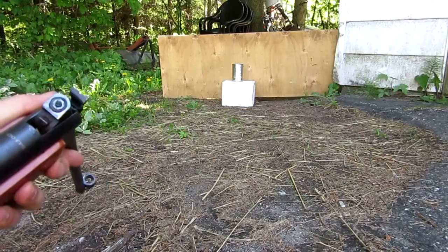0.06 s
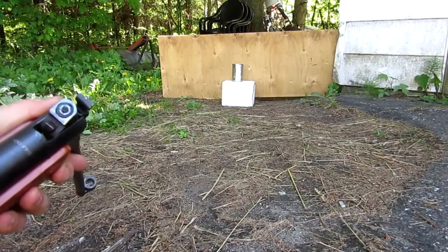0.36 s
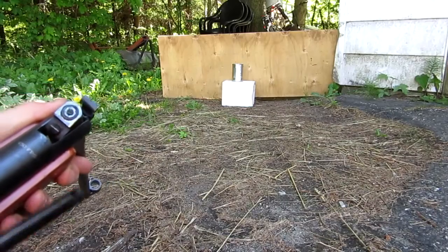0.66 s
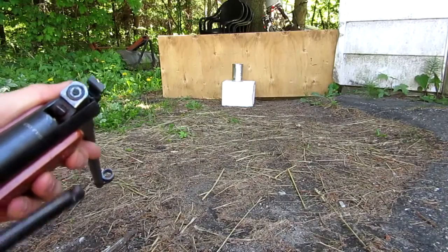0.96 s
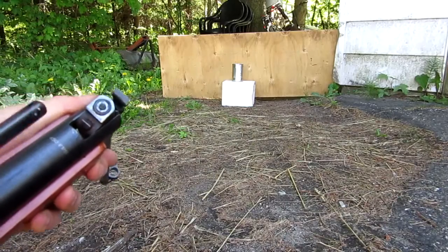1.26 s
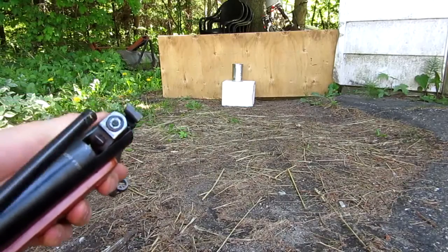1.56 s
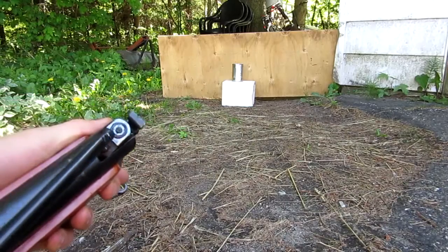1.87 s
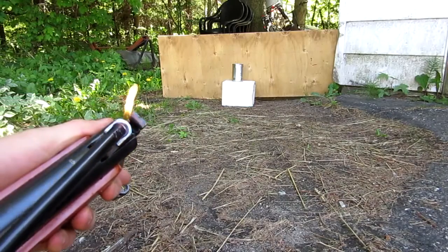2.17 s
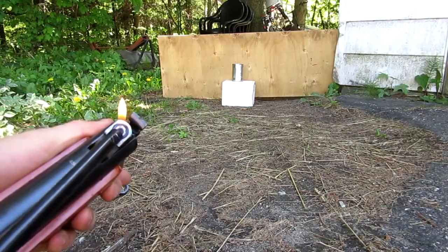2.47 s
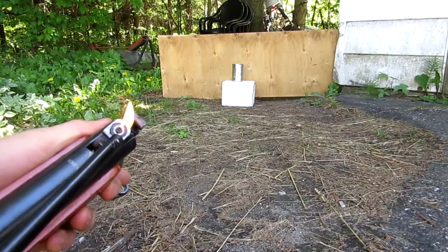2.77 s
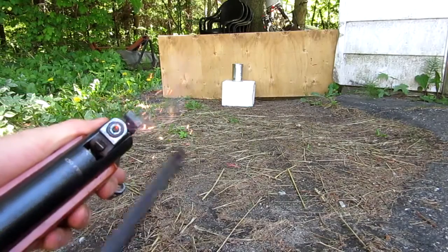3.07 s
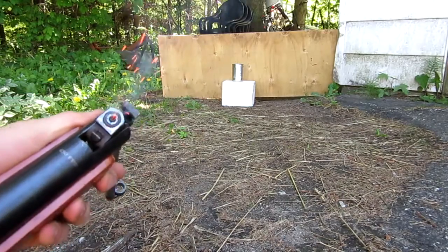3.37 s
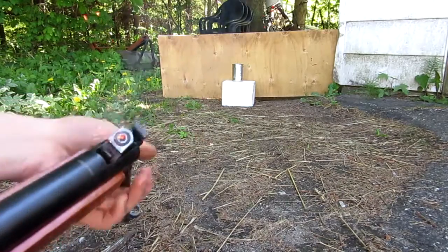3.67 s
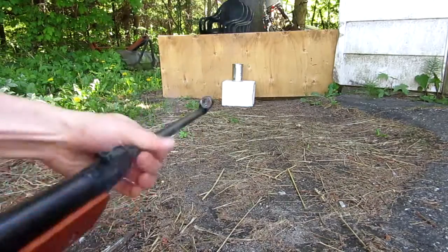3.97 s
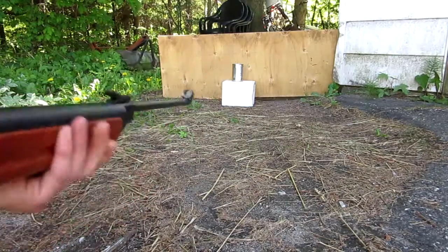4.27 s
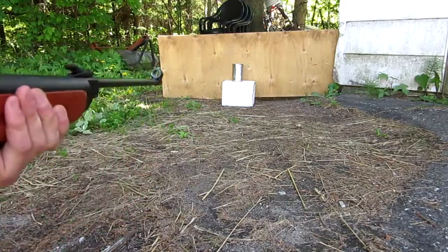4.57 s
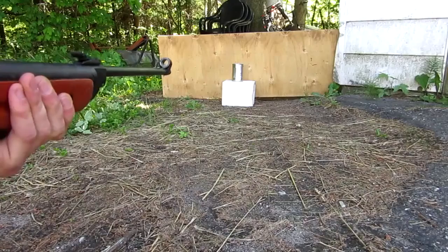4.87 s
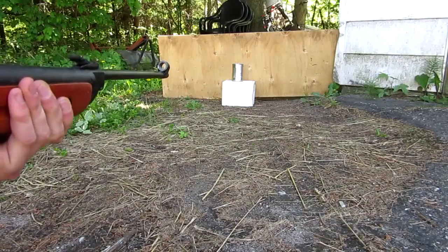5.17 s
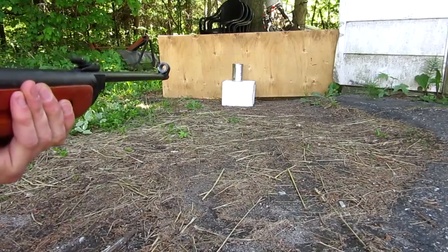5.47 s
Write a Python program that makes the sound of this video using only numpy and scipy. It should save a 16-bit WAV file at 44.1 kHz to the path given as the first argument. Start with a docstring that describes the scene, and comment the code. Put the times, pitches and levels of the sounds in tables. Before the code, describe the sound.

Close to the microphone in a quiet yard, an air gun gives a short knock and fingers rub softly over it. A lighter creaks faintly, then fires with one sharp click. A fuse catches and fizzes and spits for about a second while the gun is regripped with sharp wood and steel knocks. The barrel scrapes over its latch and shuts with a loud clunk. Distant traffic hums and birds call faintly.

```python
'''In a yard, an air gun is handled close to the camera. A lighter creaks, clicks and lights a fuse in the
breech, which fizzes and spits. The gun knocks as it is regripped, each impact exciting damped modes of
wood, steel and the camera's housing, and the barrel scrapes over its latch and snaps shut. Distant
traffic hums, birds call faintly, and the camera's gain control ducks everything after each loud blow.'''
import sys
import numpy as np
from scipy import signal
from scipy.fft import rfft, irfft
from scipy.io import wavfile

SR = 44100
rng = np.random.default_rng(int(sys.argv[2]) if len(sys.argv) > 2 else 0)


def transcribe(signal):
    """Save signal, clipped to [-1, 1], as a 16-bit WAV file at the path in sys.argv[1]."""
    frames = np.atleast_2d(signal).T
    limited = np.clip(frames, -1, 1)
    pcm = np.round(limited * 32767).astype(np.int16)
    wavfile.write(sys.argv[1], SR, pcm)


N = 243828
TIME = np.arange(N) / SR
RING_TIME = np.arange(4096) / SR
CATCH_S, SHUT_S = 3.114, 3.98  # the fuse burns from catching until the barrel shuts it in

# spectrum of hard contact, as of steel on steel: frequency_hz, level_db
CONTACT_SPECTRUM = [(1500, -10.5), (3300, -8), (4100, -5), (5000, -1.5), (6300, -2), (8200, -1),
                    (9700, -7.5), (11500, -9), (13500, -11.5), (15000, -16), (16000, -23)]


def amp(db):
    """Amplitude ratio of a level in decibels."""
    return 10 ** (np.asarray(db) / 20)


def unit_rms(x):
    """Power normalisation to rms 1."""
    return x / np.sqrt(np.mean(x ** 2) + 1e-20)


def burst(x):
    """Energy normalisation of a transient to that of 5 ms at rms 1."""
    return x * np.sqrt(.005 * SR / (np.sum(x ** 2) + 1e-20))


def value_at(points, hz):
    """Interpolation of a table along a logarithmic frequency axis."""
    f, value = np.transpose(points)
    return np.interp(np.log(hz + 1), np.log(f + 1), value)


def add(mix, start_s, sound):
    """Superposition of a sound on the mix."""
    part = mix[max(round(start_s * SR), 0):][:len(sound)]
    part += sound[:len(part)]


def colour(x, spectrum):
    """Minimum-phase filtering: a causal response with the given spectrum."""
    log_gain = np.log(amp(value_at(spectrum, abs(np.fft.fftfreq(4096, 1 / SR)))))
    taps = np.fft.ifft(np.exp(np.conj(signal.hilbert(log_gain)))).real
    return signal.oaconvolve(x, taps)[:len(x)]


def narrowband(hz, half_width_hz):
    """A resonance driven by noise gives a wavering tone."""
    f = np.fft.rfftfreq(N, 1 / SR)
    return unit_rms(irfft(rfft(rng.standard_normal(N)) / (1 + ((f - hz) / half_width_hz) ** 2), N))


def waver(per_s, depth_db):
    """Random modulation: a factor that wanders about 1."""
    return amp(depth_db * np.interp(TIME * per_s, np.arange(4096), rng.standard_normal(4096)))


def grains(spread_db):
    """Granular noise: dense tiny impacts of uneven size."""
    size_db = spread_db * np.minimum(rng.exponential(1, N // 16 + 1), 5)
    return rng.standard_normal(N) * amp(np.repeat(size_db, 16)[:N])


def ring(modes, detune, rise_s):
    """Free vibration in damped modes; each blow lands elsewhere and weights them differently."""
    hz, db, t60 = np.transpose(modes)[:, :, None]
    weight_db, shift, phase = rng.standard_normal((3, len(modes), 1))
    decay = amp(db + weight_db - 60 * RING_TIME / t60)
    waves = decay * np.sin(2 * np.pi * (hz * (1 + detune * shift) * RING_TIME + phase))
    # little is radiated below the lowest mode
    skirt = signal.butter(2, .75 * hz.min(), "highpass", fs=SR, output="sos")
    return burst(signal.sosfilt(skirt, waves.sum(0) * (1 - np.exp(-RING_TIME / rise_s))))


def crack(spectrum, t60_s, spike_s=.0006):
    """An impulse is broadband: a sharp spike of noise, then a short rattle."""
    decay = amp(-60 * RING_TIME / t60_s) + 1.2 * np.exp(-RING_TIME / spike_s)
    return burst(colour(rng.standard_normal(len(RING_TIME)) * decay, spectrum))


def traffic(level_db=-50.5, pass_s=1.43, pass_width_s=.21, pass_db=5):
    """Distant vehicles sum incoherently to a low roar, which swells as one passes."""
    # spectrum of the roar: frequency_hz, level_db
    spectrum = [(20, 2.5), (45, -1), (70, 10), (120, -1), (220, -0.5), (450, -2), (750, -6), (900, -6),
                (1080, -8), (1400, -8.5), (1800, -45.5), (3000, -39), (8000, -44.5)]
    level = amp(level_db + pass_db * np.exp(-((TIME - pass_s) / pass_width_s) ** 2))
    roar = unit_rms(colour(rng.standard_normal(N), spectrum))
    return roar * level * waver(per_s=6.3, depth_db=-1.9)


def engine(pitch_hz=78, overtone_db=-9):
    """Nearly periodic motion in a distant engine gives a fundamental and its second harmonic."""
    # course of the hum: time_s, level_db
    levels = [(0, -72), (.17, -55.5), (.9, -51), (2.0, -49.5), (3.1, -49.5), (3.65, -57), (5.1, -50.5),
              (5.53, -52.5)]
    wavering_hz = pitch_hz * waver(per_s=6.2, depth_db=.33)
    tone = np.sin(2 * np.pi * np.cumsum(wavering_hz) / SR)
    fundamental = .83 * tone + .77 * narrowband(pitch_hz, half_width_hz=22)
    overtone = amp(overtone_db) * narrowband(2 * pitch_hz, half_width_hz=27)
    return (fundamental + overtone) * amp(np.interp(TIME, *np.transpose(levels)))


def camera_noise(hiss_db=-58):
    """Self-noise of the camera: a narrowband whirr over broadband hiss."""
    # bands of the whirr: pitch_hz, width_hz, level_db
    bands = [(885, 55, -64), (1269, 87, -58), (1503.5, 28, -60)]
    # spectrum of the hiss: frequency_hz, level_db
    hiss_spectrum = [(100, -7.5), (1500, 13.5), (2500, 3), (4000, 1), (7500, 0), (10500, -4.5),
                     (12000, -7.5), (15000, -9.5), (16000, -28.5)]
    whirr = sum(amp(db) * narrowband(hz, width / 2) for hz, width, db in bands)
    return whirr + amp(hiss_db) * unit_rms(colour(rng.standard_normal(N), hiss_spectrum))


def blow(strength_db, thud_db, clank_db, tick_db, stock_below_hz=1000, steel_from_hz=1450):
    """Impact excitation: the stock thuds, middle modes and steel ring, and the contact ticks."""
    # modes heard on each blow, including a 1.2 kHz ring of the camera's housing:
    # pitch_hz, level_db, t60_s
    modes = [(705, -3, 0.021), (809.3, 3, 0.014), (928.5, -3.5, 0.02), (1058, -8.5, 0.029), (1203, 1, .023),
             (1413, -7, .014), (1630, 4, .018), (1830, -0.5, 0.012), (2230, -2, 0.018), (2670, 0.5, .018),
             (3030, -7, .018), (3450, -2.5, 0.008)]
    # heavy blows stay in contact longer and thud lower: strength_db, pitch_hz
    thud_pitches = [(-15, 350), (-4.5, 200)]
    stock_modes = [m for m in modes if m[0] < stock_below_hz]
    middle_modes = [m for m in modes if stock_below_hz <= m[0] < steel_from_hz]
    steel_modes = [m for m in modes if m[0] >= steel_from_hz]
    thud_hz = np.interp(strength_db, *np.transpose(thud_pitches))
    cycles = thud_hz * RING_TIME
    thud = burst(np.sin(2 * np.pi * cycles) * cycles * np.exp(-cycles / .43))
    # a deeper blow drives the low modes of the wood harder
    wood = (300 / thud_hz) ** 1.5 * ring(stock_modes, detune=.02, rise_s=.0005)
    middle = ring(middle_modes, detune=.01, rise_s=.00073)
    clank = amp(clank_db) * ring(steel_modes, detune=.044, rise_s=.00011)
    tick = amp(tick_db) * crack(CONTACT_SPECTRUM, t60_s=.012)
    return amp(strength_db) * (middle + amp(thud_db) * (thud + wood) + clank + tick)


def gun_knocks(rebound_db=-9, dull_db=-3.5, lowest_hz=62):
    """Inelastic collision: after each blow the loose parts rebound, softer and duller."""
    # blows on the gun, with thud, clank and tick relative to the strength:
    # start_s, strength_db, thud_db, clank_db, tick_db, rebound_delay_s
    knocks = [(0.0553, -39.5, -25, 10.5, 5, .0025), (0.061, -32, -17, -1, -4.5, .002),
              (0.1016, -14.5, -34.5, -11.5, -9.5, 0.003615), (3.3498, -14.5, 0, 11, 0.5, .0028),
              (3.3573, -20.5, -11, -3, -1, 0.0042), (3.3737, -13.5, 0, 4.5, 13, 0.0012),
              (3.418, -28, -6, 5, -3.5, 0.004), (3.541, -28, -8.5, -4.5, -15, .004),
              (3.5816, -24, -11.5, 4, 6, .0085), (3.6769, -25.5, -7, 3, -7, .0035),
              (3.7055, -40.5, 9.5, 11, 10.5, 0.0018), (3.7522, -45, 5, 5, -4, 0.0022),
              (3.9078, -42.5, -2, 10, 3, .003), (3.9615, -18.5, -8, 1, -3, .0125),
              (3.9832, 2, -8.5, -7.5, -13.5, 0.0078), (4.004, -35.5, -2.5, 7.5, 14, .002),
              (4.0124, -3.5, -13, -11, -19, 0.0065)]
    out = np.zeros(N)
    for start_s, strength_db, thud_db, clank_db, tick_db, delay_s in knocks:
        add(out, start_s, blow(strength_db, thud_db, clank_db, tick_db))
        rebound = blow(strength_db + rebound_db, thud_db, clank_db + dull_db, tick_db + dull_db)
        add(out, start_s + delay_s, rebound)
    # the knocks carry no deep bass
    return signal.sosfilt(signal.butter(2, lowest_hz, "highpass", fs=SR, output="sos"), out)


def steel_scrapes(steel_db=-5, attack_s=.001, release_s=.0051):
    """Friction: steel parts rattle briefly after knocks, and the latch grinds as the barrel shuts."""
    # steel slides and rattles on steel: start_s, length_s, final_level_db, swell_db
    scrapes = [(0.061, 0.017, -43.5, 0), (3.35, 0.021, -32.5, -10), (3.573, 0.0064, -16.5, 16),
               (3.911, 0.043, -29, 17.5), (3.959, 0.007, -12.5, -3.5), (3.972, 0.014, -9, 1.5),
               (4.01, .013, -23, -1)]
    # spectrum of the scraping: frequency_hz, level_db
    grit_spectrum = [(30, -36.5), (130, -16), (500, -22.5), (750, -2), (1300, 3.5), (2300, -6), (3400, -4),
                     (4500, -15), (8000, -12.5), (10500, -9.5), (11800, -33), (15000, -29), (16000, -41.5)]
    pressure = np.zeros(N)
    for start_s, length_s, db, swell_db in scrapes:
        attack = np.minimum(RING_TIME / attack_s, 1)
        swell = amp(db - swell_db * np.maximum(1 - RING_TIME / length_s, 0))
        release = np.exp(-np.maximum(RING_TIME - length_s, 0) / release_s)
        add(pressure, start_s, attack * swell * release)
    grit = unit_rms(colour(grains(spread_db=1.8), grit_spectrum))
    slips = unit_rms(colour(grains(spread_db=3.5), CONTACT_SPECTRUM))
    return pressure * (grit + amp(steel_db) * slips)


def fingers():
    """Stick-slip friction: skin catches and slides on wood and steel."""
    # strokes along the gun: start_s, length_s, level_db
    rubs = [(0.124, 0.21, -58.5), (0.221, 0.047, -51.5), (0.302, 0.031, -51), (0.337, 0.018, -55),
            (0.68, 0.058, -56.5), (1.058, 0.11, -63), (4.238, 0.23, -57.5)]
    # spectrum of rubbing skin: frequency_hz, level_db
    spectrum = [(200, -17), (1500, 1), (2500, 7), (3700, -2), (5300, 3.5), (8000, -1.5), (11500, -7),
                (14000, -13), (16000, -30)]
    catching = waver(per_s=150, depth_db=2.5)
    friction = unit_rms(colour(grains(spread_db=4), spectrum) * catching)
    pressure = np.zeros(N)
    for start_s, length_s, db in rubs:
        add(pressure, start_s, amp(db) * signal.windows.tukey(int(length_s * SR) + 2, .8))
    return pressure * friction


def click(clack_db, snap_db, ring_db=-3, spring_from_hz=4000):
    """Heavy damping makes a dry click: the lighter's plastic case clacks and its spring snaps."""
    # modes heard on each click, including a 1.2 kHz ring of the camera's housing:
    # pitch_hz, level_db, t60_s
    modes = [(1200, 3.5, 0.024), (1770, -1.5, 0.015), (2930, -9.5, 0.031), (4700, -1, 0.024),
             (6030, 5.5, .009), (6500, -7.5, 0.022), (7750, -3, 0.014), (7350, -5.5, 0.007),
             (8764, -7.5, 0.011), (10270, -7, .009), (13200, -5, .006)]
    # spectrum of the case: frequency_hz, level_db
    case_spectrum = [(200, -22), (700, -6), (1200, -0.5), (1900, -5), (2800, -0.5), (3700, -12),
                     (6000, -15), (15000, -33)]
    low_modes = [m for m in modes if m[0] < spring_from_hz]
    spring_modes = [m for m in modes if m[0] >= spring_from_hz]
    clack = crack(case_spectrum, t60_s=.012)
    clack += amp(ring_db) * ring(low_modes, detune=.015, rise_s=.0001)
    snap = crack(CONTACT_SPECTRUM, t60_s=.018)
    snap += amp(ring_db) * ring(spring_modes, detune=.036, rise_s=.0001)
    return amp(clack_db) * burst(clack) + amp(snap_db) * burst(snap)


def lighter(fire_s=2.2103, push_db=-5, push_s=.00059, zing_db=-39, zing_t60_s=.25):
    """The trigger creaks; the spring frees its elastic energy in a snap, a push of air and a zing."""
    # the trigger is squeezed and let go: start_s, level_db
    creaks = [(0.7581, -50), (0.7885, -45), (0.941, -73), (1.6, -52.5), (1.7713, -49.5), (1.8332, -41),
              (1.8955, -52.5), (1.9331, -47.5), (1.9717, -32), (2.8746, -58), (2.9645, -42.5),
              (2.999, -43.5)]
    # the clack follows a creak's level only in part, so louder creaks are brighter
    even_db, follow = -46, .27
    out = np.zeros(N)
    for start_s, db in creaks:
        add(out, start_s, click(clack_db=even_db + follow * (db - even_db), snap_db=db))
    add(out, fire_s, click(clack_db=-12.5, snap_db=-1.5))
    push = -amp(push_db) * np.sin(np.pi * np.minimum(RING_TIME / push_s, 1))
    add(out, fire_s - push_s, push)
    zing = amp(zing_db - 60 * TIME / zing_t60_s) * narrowband(hz=8000, half_width_hz=600)
    add(out, fire_s, zing)
    return out


def birds():
    """Scattering by the trees blurs far calls into gliding bands of noise."""
    # calls: start_s, length_s, start_hz, end_hz, blur_width_hz, level_db
    calls = [(2.7, 0.64, 3790, 4020, 219, -69), (4.096, 0.47, 4000, 3980, 240, -68),
             (4.43, 0.25, 3716, 3490, 399, -68), (5.11, 0.079, 2187, 2177, 24.7, -56),
             (5.161, 0.2, 2185, 2210, 70, -66.5), (5.38, .06, 2020, 1980, 39.8, -66)]
    out = np.zeros(N)
    for start_s, length_s, start_hz, end_hz, width_hz, db in calls:
        size = int(length_s * SR) + 2
        phase = 2 * np.pi * np.cumsum(np.linspace(start_hz, end_hz, size)) / SR
        lowpass = signal.butter(2, width_hz / 2, fs=SR, output="sos")
        blur = signal.sosfilt(lowpass, rng.standard_normal((2, size)))
        call = blur[0] * np.cos(phase) + blur[1] * np.sin(phase)
        add(out, start_s, amp(db) * unit_rms(call * signal.windows.tukey(size, .6)))
    return out


def fuse(burn_db=-50.5, fizz_db=-53.5, rise_s=.018, fade_s=.057, smoulder_db=-9, growth_db_per_s=55.5):
    """Combustion noise: the fuse smoulders, flares as it catches, then fizzes and spits."""
    # spectrum of the flame: frequency_hz, level_db
    flare_spectrum = [(25, -35.5), (70, -23), (200, -4), (450, -1.5), (750, 0.5), (1200, -2), (2300, -10.5),
                      (3500, -13.5), (6000, -15.5), (15000, -29.5)]
    # spectrum of the fizz: frequency_hz, level_db
    fizz_spectrum = [(200, -33), (1000, -14), (3000, -4.5), (5000, 1.5), (8500, -2), (10800, 1.5),
                     (12000, -6), (14800, -6.5), (15600, -28)]
    # surges of the flame: start_s, level_db
    flare_ups = [(3.12, -38), (3.68, -42.5)]
    # spits of the fuse: start_s, pop_db, crack_db
    spits = [(3.1945, -38.5, -43), (3.2132, -29, -26.5), (3.2355, -38, -64)]
    lit = np.clip((TIME - CATCH_S) / rise_s, 0, 1)
    smoulder = amp(smoulder_db + growth_db_per_s * np.minimum(TIME - CATCH_S, 0))
    burn = np.maximum(lit, smoulder) * (TIME < SHUT_S)
    flame = amp(burn_db) * burn
    for start_s, db in flare_ups:
        add(flame, start_s, amp(db) * np.minimum(TIME / rise_s, 1) * np.exp(-TIME / fade_s))
    flare = unit_rms(colour(grains(spread_db=2.5), flare_spectrum)) * waver(per_s=110, depth_db=3.5)
    fizz = unit_rms(colour(grains(spread_db=2.7), fizz_spectrum)) * waver(per_s=39, depth_db=.5)
    out = flame * flare + amp(fizz_db) * burn * fizz
    for start_s, pop_db, crack_db in spits:
        pop = amp(pop_db) * crack(flare_spectrum, t60_s=.047)
        add(out, start_s, pop + amp(crack_db) * crack(fizz_spectrum, t60_s=.014))
    return out


def sparks(per_s=30, level_db=-52, spread_db=1):
    """Shot noise: tiny cracks at independent random moments while the fuse burns."""
    alight = (TIME > CATCH_S) & (TIME < SHUT_S)
    size = amp(level_db + spread_db * rng.standard_normal(N))
    pops = size * alight * (rng.random(N) < per_s / SR)
    return signal.oaconvolve(pops, crack(CONTACT_SPECTRUM, t60_s=.006))[:N]


def yard(x, wet_db, tail_db=-29):
    """Reflection and scattering add a few near echoes and a thin tail from fence and leaves."""
    # leaves and soil absorb the highest treble: frequency_hz, level_db
    tail_spectrum = [(100, -4.5), (1000, -3.5), (2000, 3.5), (5000, -2), (8300, -2), (10000, -5.5),
                     (15000, -7.5)]
    # decay of the tail: frequency_hz, t60_s
    decay_times = [(200, 1.17), (1200, 0.5), (4000, 0.57), (8000, 0.48), (15000, 0.4)]
    # reflections off ground and walls: delay_s, level_db
    echoes = [(0.0151, -21.5), (0.0223, -34.5), (0.024, -30), (.068, -46.5)]
    t = np.arange(SR // 2) / SR
    hz, frame_s, bands = signal.stft(rng.standard_normal(len(t)), SR, nperseg=256)
    decay_db = 60 * frame_s / value_at(decay_times, hz)[:, None]
    bands *= amp(value_at(tail_spectrum, hz)[:, None] - decay_db)
    tail = signal.istft(bands, SR, nperseg=256)[1][:len(t)] * (1 - np.exp(-t / .005))
    response = amp(tail_db) * tail / np.linalg.norm(tail)
    for delay_s, db in echoes:
        add(response, delay_s, amp([db]))
    return x + amp(wet_db) * signal.oaconvolve(x, response)[:N]


def scene():
    """Superposition of the near sources, with their reflections, and the background."""
    gun = yard(gun_knocks() + steel_scrapes() + fingers(), wet_db=-3.5)
    fire = yard(lighter() + fuse() + sparks(), wet_db=-4)
    return (gun + fire + birds() + traffic() + engine() + camera_noise())[None]


def microphone_port(x, hz=10400, width_hz=700, lift=.26):
    """Resonance of the microphone's port lifts a narrow band of high treble."""
    return x + lift * signal.lfilter(*signal.iirpeak(hz, hz / width_hz, fs=SR), x)


def excess(x, window_s, limit_db, recover_db_per_s):
    """Envelope detection: decibels of smoothed power above a limit, released at a steady rate."""
    pole = np.exp(-1 / (window_s * SR))
    power_db = 10 * np.log10(signal.lfilter([1 - pole], [1, -pole], x ** 2) + 1e-12)
    fall_db = TIME * recover_db_per_s
    held_db = np.maximum.accumulate(power_db + fall_db) - fall_db
    return np.maximum(held_db - limit_db, 0)


def record(dry, edge_hz=15150):
    """Compression: a quick limiter and slow gain control duck the sound, then clipping and a low-pass."""
    x = microphone_port(dry[0])
    quick_db = excess(x, window_s=.0025, limit_db=-11, recover_db_per_s=14)
    slow_db = excess(x, window_s=.097, limit_db=-20, recover_db_per_s=4)
    duck_db = np.maximum(np.minimum(quick_db, 11), slow_db)
    ducked = np.clip(x / amp(duck_db), -1, 1)
    lowpass = signal.firwin(255, edge_hz, window=("kaiser", 8), fs=SR)
    return signal.oaconvolve(ducked, lowpass, "same")[None]


dry = scene()
out = record(dry)
transcribe(out)
```